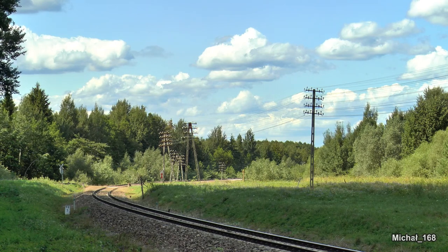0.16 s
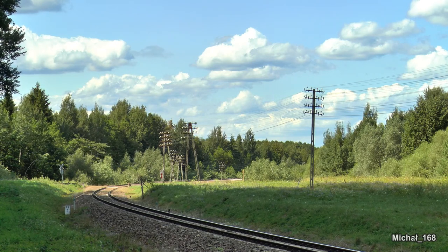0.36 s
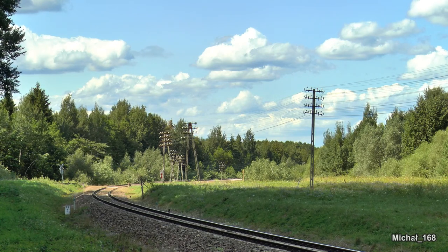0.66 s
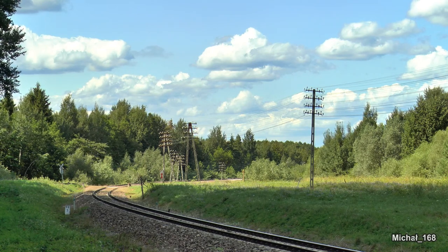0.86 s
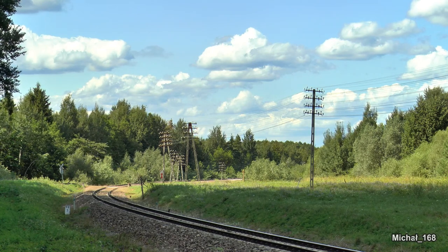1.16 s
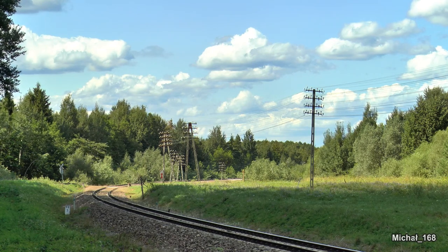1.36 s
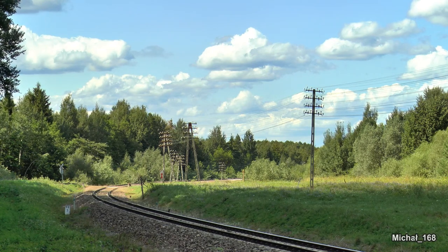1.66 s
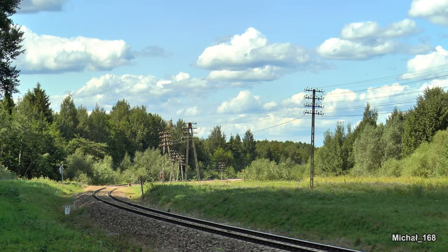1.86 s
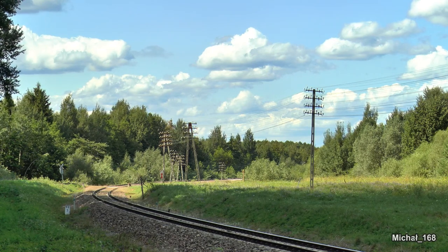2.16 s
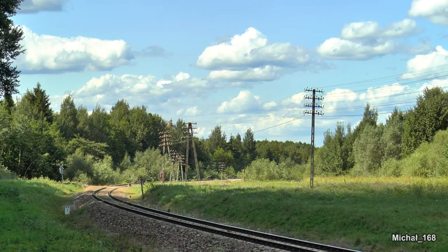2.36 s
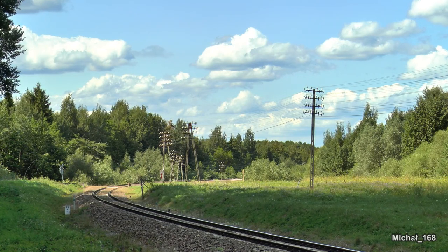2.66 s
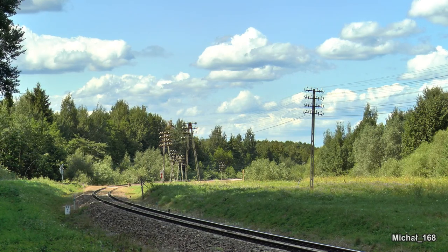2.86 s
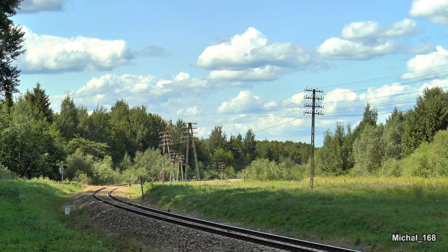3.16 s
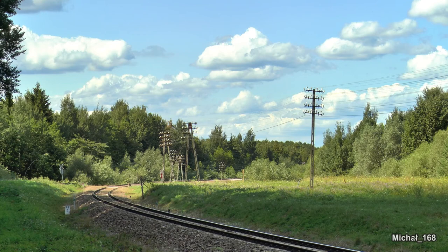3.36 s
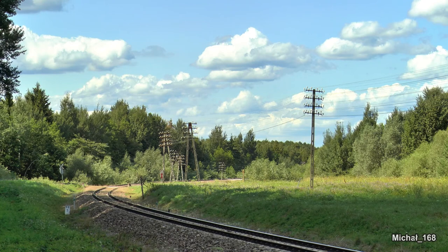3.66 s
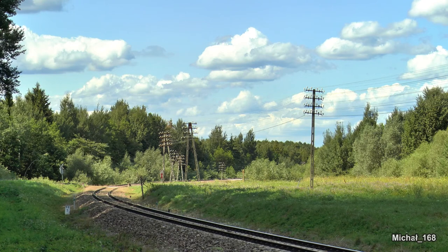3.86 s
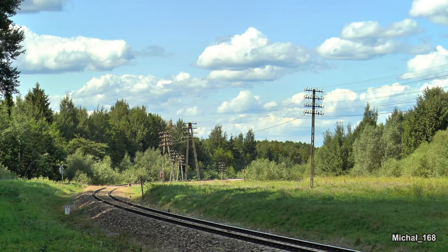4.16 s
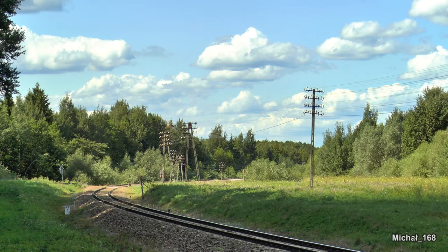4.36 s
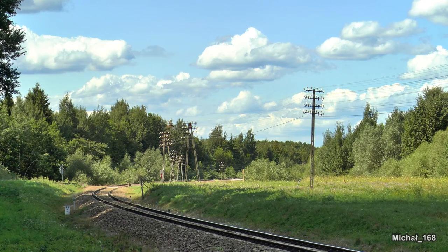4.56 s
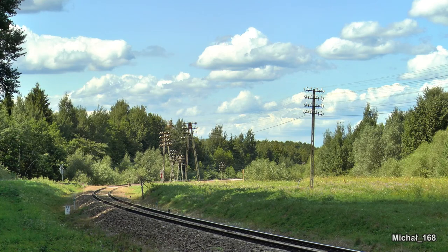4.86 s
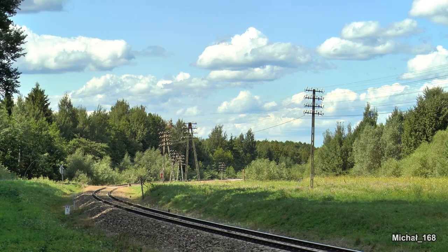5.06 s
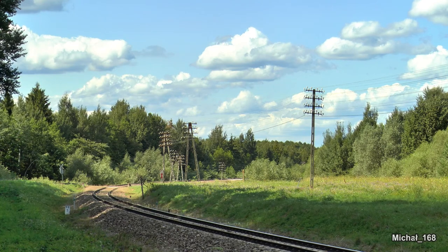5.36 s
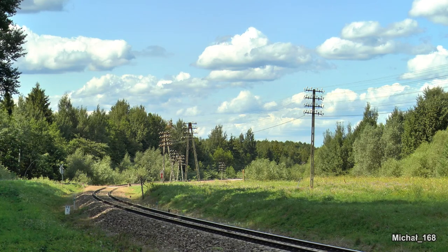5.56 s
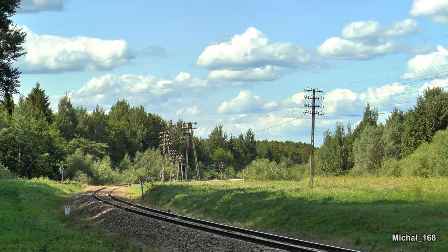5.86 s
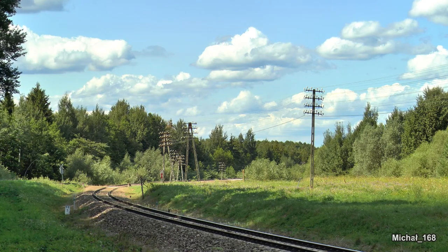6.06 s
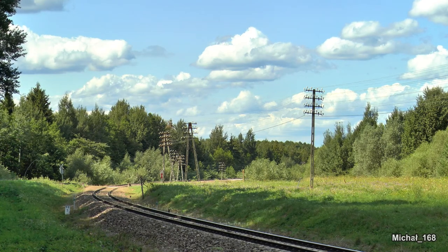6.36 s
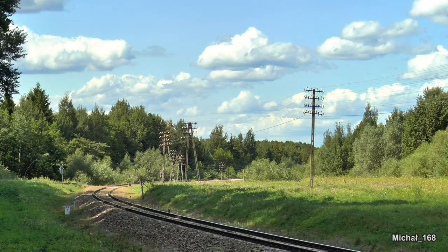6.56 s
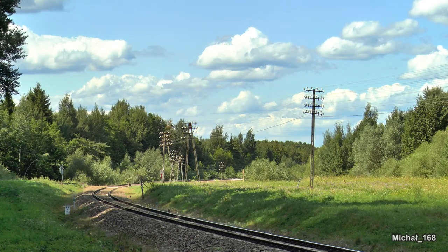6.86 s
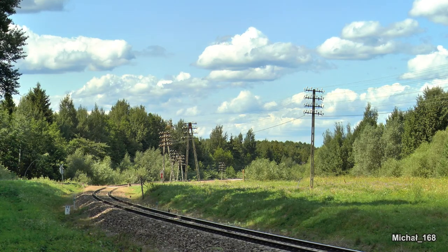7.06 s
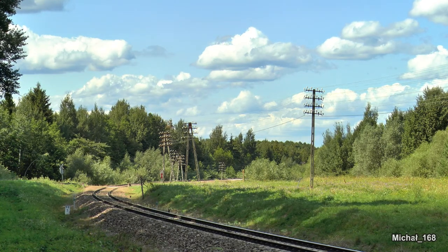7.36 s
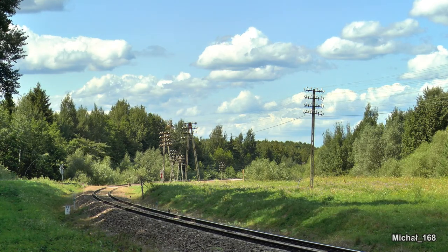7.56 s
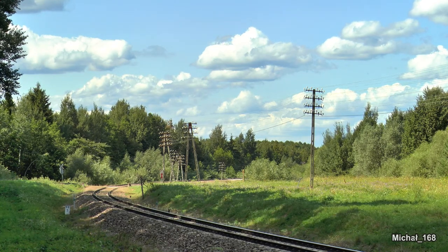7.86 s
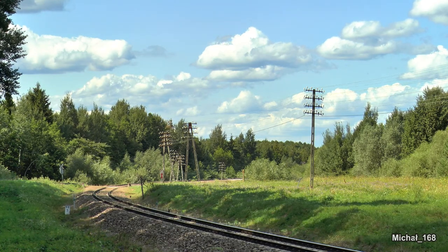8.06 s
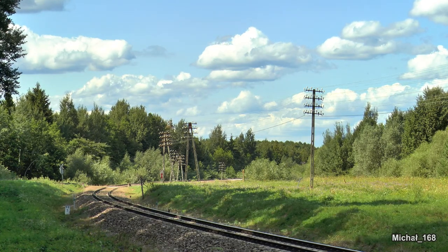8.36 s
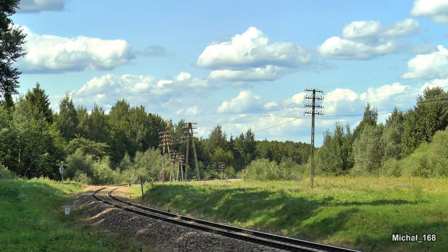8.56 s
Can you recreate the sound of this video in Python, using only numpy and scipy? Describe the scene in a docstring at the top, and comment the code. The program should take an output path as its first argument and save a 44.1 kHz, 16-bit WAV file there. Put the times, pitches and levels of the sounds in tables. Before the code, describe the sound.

Outdoors in a meadow by woods, an unseen diesel freight train makes a distant steel bridge boom continuously, with muffled rolling and a low engine drone. Bush crickets buzz in soft pulses. Midway a close grasshopper starts a fast dry rattle, swells for about three seconds and stops dead, leaving train, faint insects and a light breeze. The stationary microphone is near the grass, far from the train.

```python
"""The low boom of a steel bridge carries from behind a wood throughout: a far diesel freight train excites it.
Rolling noise, wheel hiss, the engine's drone and a thin whine are noise bands with their own level curves.
A near grasshopper swells through one rattling verse and stops: leg strokes modulate noise in its wing's bands.
Bush crickets buzz as pulsed noise in the meadow, with brief insect rasps and the gliding tones of a far bird.
A light breeze rumbles in the bass as uneven low noise, over an even hiss of the air."""
import sys
import numpy as np
from scipy import signal
from scipy.fft import rfft, irfft
from scipy.io import wavfile
from scipy.ndimage import uniform_filter1d

SR = 44100
rng = np.random.default_rng(int(sys.argv[2]) if len(sys.argv) > 2 else 0)


def generate_wav(signal):
    """Clip the signal to [-1, 1] and save it as 16-bit WAV at the path in sys.argv[1]."""
    frames = np.transpose(np.atleast_2d(signal))
    scaled = np.clip(frames, -1, 1) * 32767
    pcm = np.round(scaled).astype(np.int16)
    wavfile.write(sys.argv[1], SR, pcm)


N = 383669
TIME = np.arange(N) / SR  # s
FREQS = np.maximum(np.arange(N // 2 + 1) * SR / N, 1)  # Hz


# weight of the train on the bridge: (time [s], boom level before trim, throb and surges [dB])
BOOM_LEVEL = [(0, -40.5), (0.6, -33), (3.0, -30.5), (4.8, -33.5), (4.97, -35.5), (8.7, -36)]
# girder resonances: (frequency [Hz], width [Hz], relative level [dB])
GIRDER_MODES = [(265.4, 42, -7), (288, 37, -8), (341.8, 35.6, 1.5), (389, 36, -2.5), (420.3, 40.5, -5),
                (452.3, 33.5, -7)]
# heavy bogies make the girders surge: (centre time [s], extra level [dB])
BOGIE_SURGES = [(1.8, 1), (2.5, 1.5), (3.07, 1.5), (3.78, 2), (4.23, 1.5), (4.75, 3)]
BOOM_TRIM_DB, THROB_DB, SURGE_S = -0.38, 0.44, 0.073
# the boom throbs as bogie after bogie rolls on, with one crest at BOGIE_AT_S
BOGIES_PER_S, BOGIE_AT_S = 2.92, 2.48
# the upper girder modes start weak and build up as the train rolls onto the span
UPPER_MODES_HZ, UPPER_START_DB, UPPER_FULL_DB, UPPER_BUILD_S = 325, -3.5, 0.8, 4.0


def bridge():
    """Forced resonance: rough wheels shake the girders, which ring in broad overlapping modes."""
    power = 0
    for hz, width, db in GIRDER_MODES:
        power = power + from_db(db) ** 2 / (1 + ((FREQS - hz) / width) ** 2) ** 3
    boom = steadied(coloured(wide_noise(side_db=-20), np.sqrt(power)), seconds=0.184)
    upper = irfft(rfft(boom) / (1 + (UPPER_MODES_HZ / FREQS) ** 16), N)
    lower = boom - upper
    upper_db = np.interp(TIME, [0, UPPER_BUILD_S], [UPPER_START_DB, UPPER_FULL_DB])
    boom = lower + upper * from_db(upper_db)
    throb_db = THROB_DB * np.cos(2 * np.pi * BOGIES_PER_S * (TIME - BOGIE_AT_S))
    level_db = in_time(BOOM_LEVEL)[0] + BOOM_TRIM_DB + throb_db + swells_db(BOGIE_SURGES, SURGE_S)
    return placed(boom * from_db(level_db), pan_db=-1.0, lag_samples=0.0)


# wheels on the rails: (time [s], rolling level before trim [dB])
ROLLING_LEVEL = [(0.2, -53), (1.33, -48.5), (3.85, -42.5), (6.44, -45.5), (8.5, -45)]
# rolling noise spectrum: (frequency [Hz], relative level per Hz [dB])
ROLLING_COLOUR = [(200, -7), (350, 0.5), (470, -1.5), (525, -0.5), (600, 1.5), (700, -2), (800, -8),
                  (960, -7.5), (1100, -15), (1500, -23.5)]
# wheel hiss spectrum: (frequency [Hz], relative level per Hz [dB])
WHEEL_HISS_COLOUR = [(600, -12.5), (1100, 0.5), (1400, -1), (2000, -7.5), (2400, -10.5), (3000, -15.5),
                     (4500, -24.5)]
# the diesel's spectrum: (frequency [Hz], relative level per Hz [dB])
ENGINE_COLOUR = [(100, -21), (122, -26), (146, 5.5), (156, -2.5), (168, 3), (200, 6), (235, 6.5),
                 (280, -12)]
# the diesel's drone: (time [s], level [dB])
DRONE_LEVEL = [(0, -55), (0.9, -56), (2.1, -49.5), (3.8, -52.5), (4.5, -48), (7.3, -49), (8.7, -43.5)]
# a wheel sings in short swells: (centre time [s], level [dB])
WHINE_SWELLS = [(3.78, -66), (4.92, -63), (5.5, -63), (6.95, -65), (7.67, -61), (8.1, -60)]
WHINE_HZ, WHINE_WIDTH_HZ, WHINE_S = 1422, 7, 0.24
# wheel hiss at the mean rolling level, and the share of the rolling level's swing that it follows
ROLLING_TRIM_DB, WHEEL_HISS_DB, HISS_FOLLOWS = 2.5, -55, 0.47


def train():
    """Broadband contact noise dulled by distance, an engine drone and the narrow resonance of a wheel."""
    rolling_db, = in_time(ROLLING_LEVEL)
    rolling = coloured(wide_noise(side_db=-14), response(ROLLING_COLOUR))
    rolling = rolling * from_db(rolling_db + ROLLING_TRIM_DB)
    hiss_db = WHEEL_HISS_DB + HISS_FOLLOWS * (rolling_db - rolling_db.mean())
    hiss = coloured(wide_noise(side_db=-22.5), response(WHEEL_HISS_COLOUR)) * from_db(hiss_db)
    engine = steadied(coloured(wide_noise(side_db=-17.5), response(ENGINE_COLOUR)), seconds=0.32)
    engine = engine * from_db(in_time(DRONE_LEVEL)[0])
    resonance = 1 / (1 + ((FREQS - WHINE_HZ) / WHINE_WIDTH_HZ) ** 2)
    whine = steadied(coloured(wide_noise(side_db=-17), resonance), seconds=0.18)
    whine = whine * sum(from_db(db) * swell(s, WHINE_S) for s, db in WHINE_SWELLS)
    return rolling + hiss + engine + whine


def peg_row(strokes):
    """Periodic excitation: every stroke drags the same row of pegs, so part of its grain repeats."""
    number = np.floor(strokes)
    since_start = np.arange(N) - np.searchsorted(number, number)  # samples into the stroke
    repeated = rng.standard_normal(N)[since_start]
    fresh = rng.standard_normal(N)
    return rms_one(repeated + 1.1 * fresh)


# pace of the legs: (time [s], stroke rate [1/s])
LEG_PACE = [(4.65, 35.606), (5.1, 31.056), (5.85, 30.758), (6.1, 34.11), (7.0, 33.233), (7.52, 29.587)]
# a loud downstroke and a weak return: (share of the leg cycle [0 to 1], relative level [dB])
LEG_CYCLE = [(0, -11), (.2, -16), (.33, -15), (.38, -1), (.5, 0), (.66, -2), (.72, -14), (.9, -10.5),
             (1, -11)]
# the wing's spectrum: (frequency [Hz], relative level per Hz [dB])
WING_COLOUR = [(3500, -33), (4500, -27), (5800, -26), (6600, -20), (7050, -9), (7300, -7), (7750, 1.5),
               (8350, -1.5), (8650, -12), (9400, -3.5), (10500, -15), (12500, -22), (14100, -21),
               (15500, -24)]
# the wing's high modes under a hard stroke: (frequency [Hz], relative level per Hz [dB])
HIGH_MODES_COLOUR = [(4000, -21), (6500, -14), (8700, -6), (9400, 8), (10400, -5), (10900, 1), (12200, -8),
                     (13300, -7), (14100, -1), (14600, -6), (15150, -1), (15600, -5)]
# the verse: start, one downstroke, full force, end, and the time it takes to stop
VERSE_START_S, DOWNSTROKE_AT_S, VERSE_FULL_S, VERSE_END_S, VERSE_STOP_S = 4.15, 4.4006, 7.05, 7.525, 0.013
# it fades in, grows to full force and holds it
VERSE_ATTACK_S, CRESCENDO_DB_PER_S, VERSE_DB = 0.4, 3.2, -41.3
# as the legs speed up it presses harder: when, over how long, and by how much
PUSH_AT_S, PUSH_S, PUSH_DB = 6.05, 0.35, 1.8


def grasshopper():
    """Stridulation: pegs on the legs scrape the wing veins in uneven jerks; the grass scatters a little."""
    travelled = np.cumsum(in_time(LEG_PACE)[0]) / SR
    strokes = travelled - np.interp(DOWNSTROKE_AT_S, TIME, travelled) + .5
    shape = rms_one(from_db(np.interp(strokes % 1, *np.transpose(LEG_CYCLE))))
    # light early strokes catch and slip; hard late ones run through more evenly
    jerk_depth_db = np.interp(TIME, [5.4, 6.6], [6, 2])
    jerks = pulsing(300 * TIME + .6 * drift(40), depth_db=jerk_depth_db)
    singing = phrase(VERSE_START_S, VERSE_END_S, VERSE_ATTACK_S, VERSE_STOP_S)
    push_db = np.interp(TIME, [PUSH_AT_S, PUSH_AT_S + PUSH_S], [-PUSH_DB, 0])
    effort_db = VERSE_DB + push_db - CRESCENDO_DB_PER_S * np.maximum(VERSE_FULL_S - TIME, 0)
    force = from_db(effort_db) * singing * shape * jerks
    scrape = placed(peg_row(strokes) * force, pan_db=-.8, lag_samples=-1.25)
    scattered = from_db(-12) * force * wide_noise(side_db=0)
    # the harder the pegs bite, the more the high modes of the wing speak
    bite_force = from_db(-8.2 + .45 * (effort_db - VERSE_DB)) * force
    bite = placed(bite_force * peg_row(strokes), pan_db=-2.5, lag_samples=-1.1)
    bite_scattered = from_db(-10) * bite_force * wide_noise(side_db=0)
    wing = coloured(scrape + scattered, response(WING_COLOUR))
    return wing + coloured(bite + bite_scattered, response(HIGH_MODES_COLOUR))


# the far chorus: (time [s], level [dB])
CHORUS_LEVEL = [(0, -63), (4.2, -57.5), (7, -53), (7.6, -61), (8.7, -61)]
# spectrum shared by all the crickets: (frequency [Hz], relative level per Hz [dB])
CRICKET_COLOUR = [(4000, -28), (6000, -22), (6600, -13), (7000, -7), (7400, -3), (8500, 0), (9000, -3.5),
                  (9600, -3.5), (10600, -9), (12000, -15), (13500, -21), (16000, -30)]
# phrases of a nearer cricket: (start time [s], end time [s], level [dB])
NEARER_PHRASES = [(0.22, 0.6, -62), (0.72, 0.96, -60), (1.2, 1.62, -59.5), (2.2, 2.65, -64.5),
                  (2.75, 3.22, -63.5), (3.22, 3.65, -59), (3.75, 4.12, -63.5), (4.15, 4.6, -61),
                  (7.7, 8.0, -66), (8.45, 8.8, -66)]
# each phrase swells and ends quickly; between phrases the buzz goes on softly
PHRASE_ATTACK_S, PHRASE_RELEASE_S, NEAR_IDLE_DB = 0.12, 0.07, -67.5
# the one phrase of a slower cricket, already sounding at time zero
SLOW_START_S, SLOW_END_S, SLOW_DB = -0.098, 1, -59


def crickets():
    """Amplitude modulation of noise: a smooth far chorus, a nearer buzz in triplets and a slower early one."""
    far = from_db(in_time(CHORUS_LEVEL)[0]) * wide_noise(side_db=-1) * from_db(1.5 * drift(60))
    cycles = 43.9 * TIME + 0.11 * drift(2)
    # three strokes to a group
    triplets = rms_one(pulsing(cycles, depth_db=7.0) * pulsing(cycles / 3, depth_db=3.0))
    phrases = 0
    for start, end, db in NEARER_PHRASES:
        phrases = phrases + from_db(db) * phrase(start, end, PHRASE_ATTACK_S, PHRASE_RELEASE_S)
    near_force = np.maximum(phrases, from_db(NEAR_IDLE_DB)) * from_db(3.44 * drift(200))
    near = near_force * triplets * rng.standard_normal(N)
    slow_force = from_db(SLOW_DB) * phrase(SLOW_START_S, SLOW_END_S, PHRASE_ATTACK_S, PHRASE_RELEASE_S)
    slow = slow_force * pulsing(25.0 * TIME, depth_db=5.0) * rng.standard_normal(N)
    near = placed(near, pan_db=-6.0, lag_samples=-0.77)
    slow = placed(slow, pan_db=6.0, lag_samples=0.97)
    return coloured(far + near + slow, response(CRICKET_COLOUR))


# short rasps of other insects: (centre time [s], length [s], level [dB])
INSECT_RASPS = [(.15, 0.037, -62), (.79, .06, -62), (1.59, .04, -65), (2.53, 0.13, -65), (2.895, .05, -63),
                (3.73, .06, -62), (7.882, .04, -63), (8.13, .012, -63), (8.35, 0.013, -57),
                (8.38, 0.02, -58)]
# rasp spectrum: (frequency [Hz], relative level per Hz [dB])
RASP_SPECTRUM = [(5000, -20), (8000, -18), (10500, 3), (13000, -5), (16000, -8)]
# calls of a far bird: (centre time [s], length [s], start pitch [Hz], end pitch [Hz], peak level [dB])
BIRD_CHIRPS = [(0.2, 0.25, 2920, 2780, -72), (6.033, 0.074, 2990, 2730, -61),
               (8.215, 0.054, 3100, 2830, -63), (8.237, .05, 2590, 2280, -62)]


def small_voices():
    """Noise bursts and frequency glides: bright insect rasps, and falling bird chirps blurred by the trees."""
    force = sum(from_db(db) * swell(s, length) for s, length, db in INSECT_RASPS)
    force = force * from_db(1.5 * drift(200))
    out = coloured(force * wide_noise(side_db=0), response(RASP_SPECTRUM))
    for s, length, start_hz, end_hz, db in BIRD_CHIRPS:
        glide = np.interp(TIME, [s - length / 2, s + length / 2], [start_hz, end_hz])
        pitch = glide + 0.5 * (start_hz - end_hz) * drift(240)
        out += from_db(db) * swell(s, length) * np.sin(2 * np.pi * np.cumsum(pitch) / SR)
    return out


# wind spectrum: (frequency [Hz], relative level per Hz [dB])
WIND_COLOUR = [(8, -33), (22, -10), (35, 3), (50, -1), (75, 0.5), (97, -1.5), (115, -6), (170, -8.5)]
# gusts: (centre time [s], extra level [dB])
GUST_SWELLS = [(0.05, 2.5), (0.7, 5.5), (1.05, 5), (1.62, 5), (1.95, 2), (4.87, 3), (5.35, 2.5), (6.2, 2.5),
               (7.15, 2.5)]
# spectrum of the air's hiss: (frequency [Hz], relative level per Hz [dB])
AIR_COLOUR = [(200, 0), (6000, 0), (10000, -2), (12000, -3.5), (14000, -5.5), (16000, -9)]
# the breeze blows evenly between gusts
BREEZE_DB, GUST_S, AIR_DB = -48.6, 0.17, -63.5


def breeze():
    """Turbulent pressure: gusty low noise, partly separate in each channel, over the even hiss of the air."""
    wind = coloured(wide_noise(side_db=-10.0), response(WIND_COLOUR))
    eddy_gain = (FREQS / 25) ** 2 / (1 + (FREQS / 38) ** 6)
    eddies = from_db([[-3], [-13]]) * coloured(rng.standard_normal((2, N)), eddy_gain)  # left, right
    rumble = steadied(wind + eddies, seconds=0.23) * from_db(BREEZE_DB + swells_db(GUST_SWELLS, GUST_S))
    hiss = from_db(AIR_DB) * coloured(wide_noise(side_db=-5.5), response(AIR_COLOUR))
    return rumble + hiss


def from_db(db):
    """Logarithmic level: decibels to amplitude gain."""
    return 10 ** (np.asarray(db) / 20)


def rms_one(x):
    """Power normalisation: scale to unit mean square."""
    return x / np.sqrt(np.mean(x ** 2) + 1e-20)


def in_time(rows):
    """Linear interpolation: the columns of a curve at every sample."""
    s, *columns = np.transpose(rows)
    return [np.interp(TIME, s, c) for c in columns]


def response(points):
    """Frequency response: gain at every frequency; beyond the ends it falls 24 dB an octave."""
    hz, db = np.transpose(points)
    octaves_outside = np.abs(np.log2(FREQS / np.clip(FREQS, hz[0], hz[-1])))
    return from_db(np.interp(np.log(FREQS), np.log(hz), db) - 24 * octaves_outside)


def coloured(x, gain):
    """Linear filtering: apply a gain per frequency, keeping the power of white noise."""
    return irfft(rfft(x) * rms_one(gain), N)


def drift(rate):
    """Low-passed noise: a random wander of spread 1, mostly below the rate in Hz."""
    return coloured(rng.standard_normal(N), 1 / (1 + (FREQS / rate) ** 2) ** 2)


def wide_noise(side_db):
    """Mid-side stereo: white noise with the side at this level relative to the middle."""
    mid, side = rng.standard_normal((2, N))
    return mid + from_db(side_db) * side * np.array([[1], [-1]])


def placed(x, pan_db, lag_samples):
    """Interaural cues: the left channel is louder by pan_db and earlier by the lag."""
    half = np.array([[.5], [-.5]])
    shift = np.exp(2j * np.pi * FREQS / SR * lag_samples * half)
    return from_db(pan_db * half) * irfft(rfft(x) * shift, N)


def steadied(x, seconds):
    """Envelope flattening: hold the joint power of the channels steady over this time."""
    power = uniform_filter1d(np.mean(x, axis=0) ** 2, max(int(seconds * SR), 1))
    return x / np.sqrt(power + 1e-12)


def pulsing(cycles, depth_db):
    """Periodic modulation: one pulse a cycle, with unit power."""
    return rms_one(from_db(depth_db * np.cos(2 * np.pi * cycles)))


def swell(centre, length):
    """Gaussian envelope: a smooth bump centred on a moment."""
    return np.exp(-2 * ((TIME - centre) / length) ** 2)


def swells_db(rows, length):
    """Superposition: extra level from a table of brief surges."""
    return sum(db * swell(s, length) for s, db in rows)


def phrase(start, end, attack, release):
    """Linear envelope: rise, hold and fall between two moments."""
    return np.clip(np.minimum((TIME - start) / attack, (end - TIME) / release), 0, 1)


def scene():
    """Superposition: the far train behind the sounds of the meadow."""
    return bridge() + train() + grasshopper() + crickets() + small_voices() + breeze()


def record(dry):
    """Band limiting: an elliptic low-pass cuts the top steeply at 15750 Hz."""
    return signal.sosfilt(signal.ellip(12, .1, 90, 15750, fs=SR, output="sos"), dry)


dry = scene()
out = record(dry)
generate_wav(out)
```